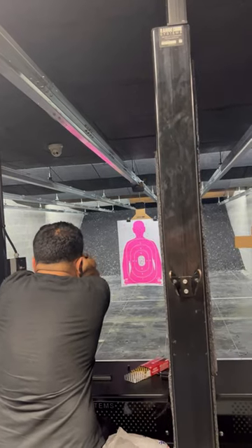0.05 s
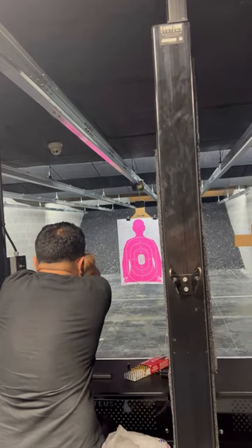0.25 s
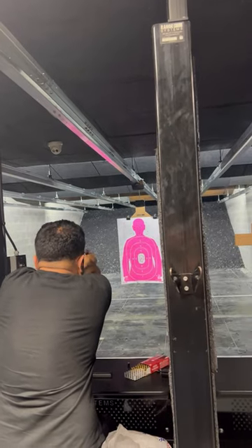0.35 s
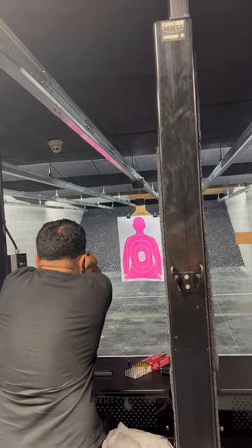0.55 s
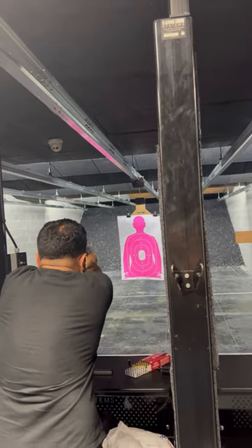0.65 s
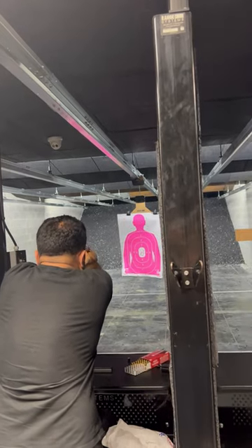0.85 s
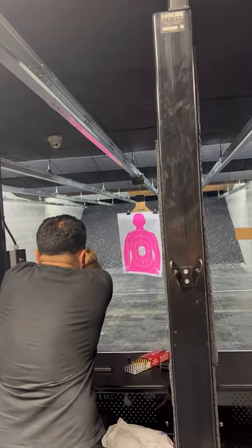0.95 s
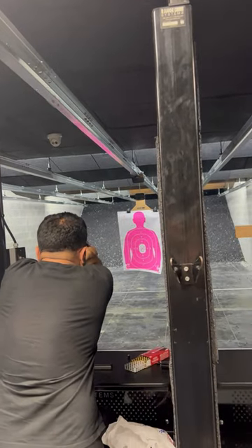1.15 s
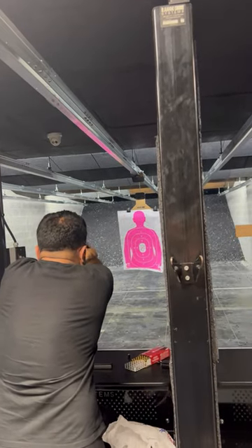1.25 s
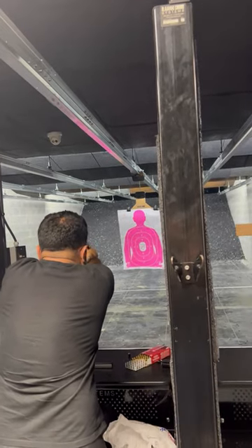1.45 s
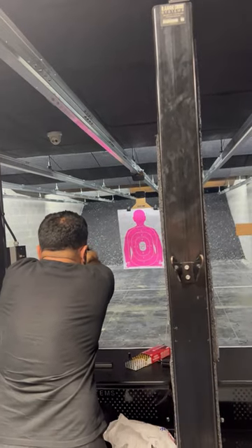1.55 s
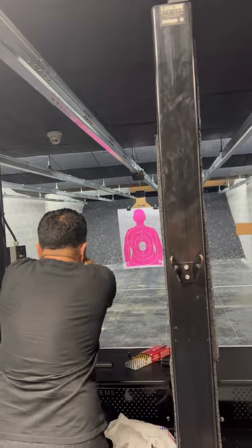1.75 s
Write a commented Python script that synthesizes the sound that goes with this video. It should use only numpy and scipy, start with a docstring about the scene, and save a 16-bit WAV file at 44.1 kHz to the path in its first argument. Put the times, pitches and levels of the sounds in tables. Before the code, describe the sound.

Pistol gunfire indoors: three sharp, booming bangs with hard concrete reverberation and faint ringing shell cases

```python
"""A handgun is fired at an even pace in a booth of an indoor range.
Over faint moving air, the tail of a shot fired just before the start dies away and a spent brass case rings.
Three more shots follow: each is a sharp shock front and a harsh blast of echoes between the booth walls,
then an echo from the far wall, the roar of the concrete hall and a long dull tail, all made of shaped noise.
After the last shot comes a faint slap from far down the hall, and more cases ring as thin, beating high notes."""
import sys
import numpy as np
from scipy import signal
from scipy.fft import rfft, irfft
from scipy.io import wavfile
from scipy.ndimage import uniform_filter1d, minimum_filter1d

SR = 44100
rng = np.random.default_rng(int(sys.argv[2]) if len(sys.argv) > 2 else 0)


def persist_wave(psi):
    """Save psi, clipped to +-1, as 16-bit WAV."""
    counts = np.round(np.clip(psi, -1, 1) * 32767).astype(np.int16)
    wavfile.write(sys.argv[1], SR, np.atleast_2d(counts).T)


N = 79380  # length in samples: 1.8 s
HZ = np.fft.rfftfreq(N, 1 / SR)
T = np.arange(N) / SR

# Faint ventilation: freq_hz, level_db_per_hz
AIR = [(25, -108), (95, -91.5), (250, -106), (800, -108), (2000, -117), (5000, -124), (12000, -134)]

# The shots: start_s, level_db, extra_bass_db, shock_front_db, crack_db, long_tail_db
# All but level_db are relative to it; a shot may start before time zero.
SHOTS = [(-0.215, -8.5, 9, -40, 6, -7), (0.2005, -1, 5, -39, -4.5, -16), (0.6252, -2, 0, -18, -1.5, -11.5),
         (1.0404, -1.5, -2.5, -50.5, -7.5, 0)]
# How much of a shot's extra bass each pitch gets: freq_hz, share
BASS_SHARE = [(50, 1.3), (110, 1.2), (190, .85), (340, 1.5), (500, 0.66), (800, 0.76), (1500, 0.36),
              (3000, 0.005)]
# How much of a shot's long-tail dB each pitch gets: freq_hz, share
TAIL_SHARE = [(70, 1), (250, 0.5), (450, -0.2), (900, 0.5)]

# Echo clouds, by band: freq_hz, level_db_per_hz, rise_s, hold_s, fall_by_60_db_s
# Levels stand before a shot's own settings; hold_s counts from the start of the cloud.
# The first crack of the shot
CRACK = [(25, -88, .003, 0.01, .04), (152, -55, 0.009, 0.01, 0.12), (440, -51, 0.0023, 0.036, .04),
         (1000, -41, .002, 0.011, .04), (1840, -59.5, 0.0016, 0.018, 0.045),
         (4500, -48.5, 0.0018, 0.0085, .05), (8000, -73.5, .001, 0.014, 0.1),
         (12000, -69.5, 0.00072, 0.0082, 0.033)]
# The blast between the booth walls
BLAST = [(25, -72.5, .025, 0.064, .2), (54.7, -55, 0.013, 0.056, .2), (119, -44.5, 0.052, .045, .13),
         (257, -51, 0.0027, 0.029, 0.13), (361.5, -46, 0.018, 0.046, 0.13), (1020, -47, 0.0016, .03, 0.1),
         (2050, -56.5, .003, .03, .11), (3000, -53, 0.0084, 0.029, .14), (5300, -54.5, 0.0045, .025, .14),
         (7000, -61.5, 0.00093, .02, 0.083), (12000, -69, .001, 0.0069, 0.19)]
# The echo from the far wall
FAR_WALL = [(25.45, -95, .01, .025, 0.16), (198, -66, .01, 0.051, 0.067), (545, -53.5, 0.021, 0.037, 0.19),
            (1018, -55.5, 0.03, 0.034, .17), (2000, -65.5, .01, 0.048, 0.37),
            (12000, -88, .01, 0.042, 0.36)]
# The roar of the hall
HALL = [(25, -69, 0.042, .12, 1), (55.6, -52.5, 0.021, .12, 0.65), (120.47, -58, 0.032, 0.072, 0.76),
        (350, -54, 0.06, 0.11, 0.33), (880, -53, 0.0082, 0.088, .41), (2052, -60, .015, 0.059, 0.35),
        (2800, -56.5, 0.007, .06, .43), (4000, -64, 0.012, 0.064, 0.36), (5400, -58, .01, .035, 0.34),
        (7460, -64, 0.012, 0.044, 0.32), (11400, -74.5, .01, 0.051, 0.33)]
# The long dull tail
TAIL = [(25, -82.5, .05, 0.12, 1.3), (70, -71.5, .05, 0.13, 1.1), (116, -68.5, 0.055, 0.25, 1),
        (230, -67, .05, 0.17, 0.92), (395, -83, 0.056, 0.28, .85), (900, -71, .05, 0.11, 1),
        (2530, -85, .05, 0.22, 0.91), (5024, -93, .05, .2, 0.94), (7900, -106, .05, 0.27, .8),
        (12000, -120, .05, .2, .7)]
# The faint slap far down the hall, which no shot setting changes
SLAP = [(25, -100, .01, .02, .4), (200, -79, 0.008, .02, 0.43), (795, -79.5, 0.0046, 0.0092, 0.42),
        (2600, -78.5, 0.0037, 0.014, 0.12), (4950, -94, 0.0059, 0.014, 0.18),
        (7900, -95, 0.0046, 0.016, 0.15), (12000, -106, 0.0085, 0.022, 0.26)]

# Resonances of booth and hall: freq_hz, width_hz, peak_db
RESONANCES = [(131, 29, 2.5), (239.2, 35, 6.5), (332, 37, 3), (361, 13, 12.5), (471, 22, 7), (514.5, 22, 0),
              (628.3, 6.5, 12), (735, 31, 2.5), (891, 22, -5.5), (1100, 140, 2), (1318, 41, 3.5),
              (3227, 100, 2.5), (3440, 18, 2.5), (4190, 73, 7)]
# How alike left and right are in crack and blast: freq_hz, likeness (1 is the same)
BLAST_LIKENESS = [(60, 1), (170, 0.58), (370, 0.99), (750, .05), (2000, 0.45), (3000, 1), (4500, 0.16),
                  (6500, .92), (8500, 0.73), (12000, 0.48)]
# How alike left and right are in all other noise from hall and air: freq_hz, likeness (1 is the same)
HALL_LIKENESS = [(60, 1), (370, 1), (900, .75), (1800, 1), (3000, 1), (4000, 0.15), (5000, 0.62), (6500, 1),
                 (8500, 0.94), (12000, 1)]
# How far left lags behind right: freq_hz, lag_radians
PORT_LAG = [(1500, 0), (2100, 0.6), (3200, 1.73), (4100, 2.03), (4900, 2), (5800, 1), (7400, -0.95),
            (10000, 2.11), (12000, 1)]

# Brass cases landing: start_s, level_db
CASES = [(0.167, -60.5), (0.998, -64), (1.366, -70), (1.446, -71), (1.585, -84), (1.683, -67), (1.704, -76),
         (1.73, -76.5)]

REPEAT = 0.5  # share of the echo pattern's power that is the same for every shot
SHOCK_S = 0.00015  # length of the shock front's overpressure
FAR_WALL_S, SLAP_S = 0.057, 1.272  # far-wall delay after each shot; start of the slap
RIPPLE_DB, RIPPLE_HZ = 3, 59.42  # typical depth and spacing of the booth's fine ripple
HALL_RING = 0.65  # share of the resonance and ripple dB that colours the hall's roar
ECHO_TOP_HZ = 11700  # noise is cut steeply above this
CASE_HZ, CASE_RING_T60 = 10030, 0.35  # a case's pitch; seconds its ring takes to fall by 60 dB
CASE_TICK_DB, CASE_TICK_T60 = 0, 0.09  # tick level against the case; seconds to fall by 60 dB
LIMIT_DB, EDGE_HZ = -1.5, 16650  # limiter ceiling; upper edge of the final sound


def amp(db):
    """Decibels to gain."""
    return 10 ** (np.asarray(db) / 20)


def read(points, hz):
    """Reads a table at any pitch, with straight lines between points on a log-frequency axis."""
    f, value = np.transpose(points)
    return np.interp(np.log(hz + 1), np.log(f + 1), value)


def add(mix, start_s, sound):
    """Adds a stereo sound at its start time, leaving out what falls outside the scene."""
    at = round(start_s * SR)
    sound = sound[:, max(-at, 0):]
    part = mix[:, max(at, 0):][:, :sound.shape[1]]
    part += sound[:, :part.shape[1]]


def noise():
    """Two unrelated noise spectra of even power per Hz, without the deepest bass or top treble."""
    low_cut = 1 - np.exp(-(HZ / 34) ** 4)
    high_cut = 1 / np.sqrt(1 + (HZ / ECHO_TOP_HZ) ** 200)
    return rfft(rng.standard_normal((2, N))) * np.sqrt(SR / 2) * low_cut * high_cut


def stereo(spectra, likeness):
    """Mixes two unrelated spectra into what two microphone ports pick up, with left lagging."""
    same = np.clip(read(likeness, HZ), -0.999, 0.999)
    mid = spectra[0] * np.sqrt((1 + same) / 2)
    side = spectra[1] * np.sqrt((1 - same) / 2)
    lag = np.exp(-1j * read(PORT_LAG, HZ))
    return np.array([(mid + side) * lag, mid - side])


def echoes(spectra, bands):
    """A dense cloud of echoes: each band rises, holds and dies at its own speed."""
    centres = [row[0] for row in bands]
    levels = [row[:2] for row in bands]
    spectra = spectra * amp(read(levels, HZ))
    out = np.zeros((2, N))
    # Each row of the identity picks one band, which fades out towards its neighbours.
    for picked, (_, _, rise, hold, t60) in zip(np.eye(len(bands)), bands):
        band = irfft(spectra * read(list(zip(centres, picked)), HZ), N)
        rising = 1 - np.exp(-T / rise)
        falling = amp(-60 * np.maximum(T - hold, 0) / t60)
        out += band * rising * falling
    return out


def ventilation():
    """Faint steady rumble of moving air, made from noise that is strongest in the bass."""
    return irfft(stereo(noise(), HALL_LIKENESS) * amp(read(AIR, HZ)), N)


def booth_colour():
    """Resonances boost or dip some pitches, and reflections add a fine random ripple; in dB."""
    ring = sum(db / (1 + (2 * (HZ - hz) / width) ** 2) for hz, width, db in RESONANCES)
    ripple = np.interp(HZ / RIPPLE_HZ, np.arange(2000), rng.standard_normal(2000))
    return ring + RIPPLE_DB * ripple * np.minimum(HZ / 1200, 1)  # less ripple in the bass


def shock_front():
    """A sudden jump in air pressure that drops below normal and then recovers."""
    return np.tile((1 - T / SHOCK_S) * np.exp(-T / SHOCK_S), (2, 1))


def gun():
    """Each shot's shock front excites echoes that partly repeat, as booth and hall stay the same."""
    out = np.zeros((2, N))
    booth, hall = noise(), noise()
    ring_db, shock = booth_colour(), shock_front()
    kept, fresh = np.sqrt(REPEAT), np.sqrt(1 - REPEAT)
    for start_s, db, bass_db, shock_db, crack_db, tail_db in SHOTS:
        shot_db = db + bass_db * read(BASS_SHARE, HZ)
        booth_gain = amp(shot_db + ring_db)
        hall_gain = amp(shot_db + HALL_RING * ring_db)
        tail_gain = amp(db + tail_db * read(TAIL_SHARE, HZ))

        crack = amp(db + crack_db) * stereo(noise(), BLAST_LIKENESS)
        blast = booth_gain * stereo(kept * booth + fresh * noise(), BLAST_LIKENESS)
        far_wall = booth_gain * stereo(noise(), HALL_LIKENESS)
        roar = hall_gain * stereo(kept * hall + fresh * noise(), HALL_LIKENESS)
        tail = tail_gain * stereo(noise(), HALL_LIKENESS)

        add(out, start_s, amp(db + shock_db) * shock)
        add(out, start_s, echoes(crack, CRACK))
        add(out, start_s, echoes(blast, BLAST))
        add(out, start_s + FAR_WALL_S, echoes(far_wall, FAR_WALL))
        add(out, start_s, echoes(roar, HALL))
        add(out, start_s, echoes(tail, TAIL))
    return out


def cases():
    """A brass case ticks on the floor and rings at three close pitches that beat together."""
    out = np.zeros((2, N))
    tick_band = signal.butter(2, [3500, 9000], "band", fs=SR, output="sos")
    for start_s, db in CASES:
        tick = signal.sosfilt(tick_band, rng.standard_normal((2, N)))
        tick *= amp(CASE_TICK_DB - 60 * T / CASE_TICK_T60)
        pitches = CASE_HZ + rng.uniform(-98, 70, size=3)
        # Left and right start each note at a different point of its wave.
        ring = sum(np.sin(2 * np.pi * (hz * T + rng.random((2, 1)))) for hz in pitches)
        ring *= amp(-60 * T / CASE_RING_T60) / np.sqrt(len(pitches))
        add(out, start_s, amp(db) * (ring + tick))
    return out


def hall_slap():
    """A faint slap far down the hall after the last shot, made as one more cloud of echoes."""
    out = np.zeros((2, N))
    add(out, SLAP_S, echoes(stereo(noise(), HALL_LIKENESS), SLAP))
    return out


def scene():
    """Moving air, shots, brass cases and the slap, added together."""
    return ventilation() + gun() + cases() + hall_slap()


def record(dry):
    """A fast limiter turns both sides down around the highest peaks; then the top treble is cut."""
    peak = abs(dry).max(0)
    needed = np.minimum(amp(LIMIT_DB) / (peak + 1e-9), 1)
    # Hold the lowest gain around each peak, then smooth it; 129 samples are about 3 ms.
    gain = uniform_filter1d(minimum_filter1d(needed, size=129), size=129)
    low_pass = signal.firwin(255, EDGE_HZ, window=("kaiser", 8), fs=SR)
    return signal.oaconvolve(dry * gain, low_pass[None], "same")


dry = scene()
out = record(dry)
persist_wave(out)
```